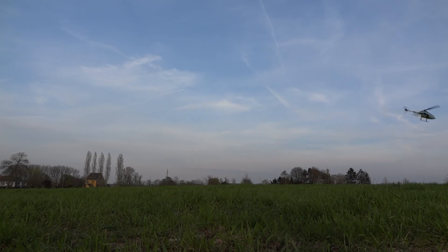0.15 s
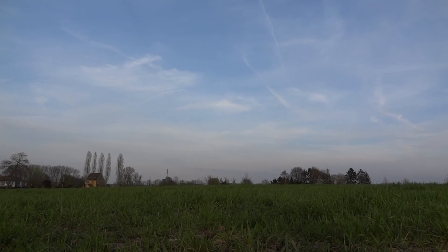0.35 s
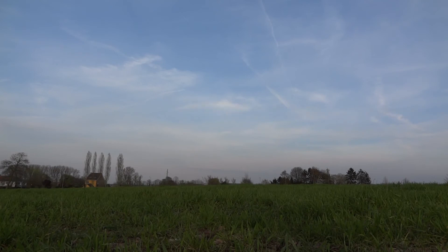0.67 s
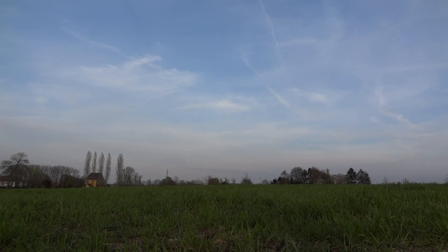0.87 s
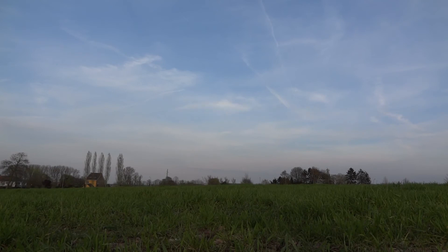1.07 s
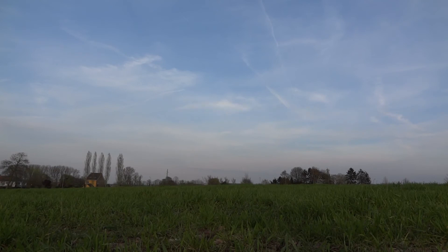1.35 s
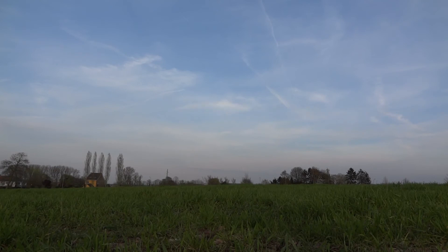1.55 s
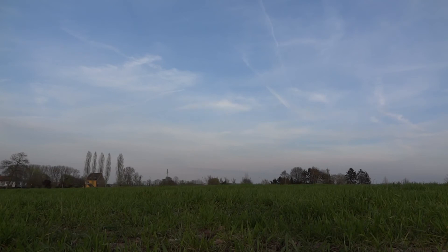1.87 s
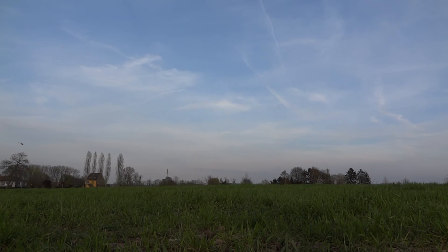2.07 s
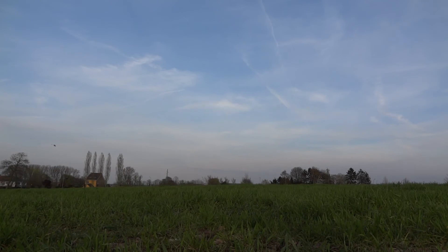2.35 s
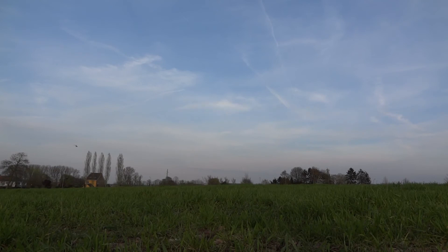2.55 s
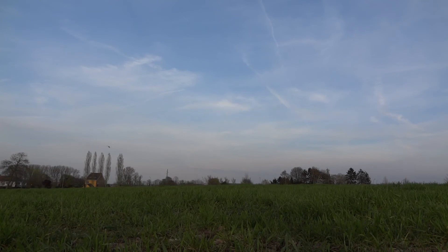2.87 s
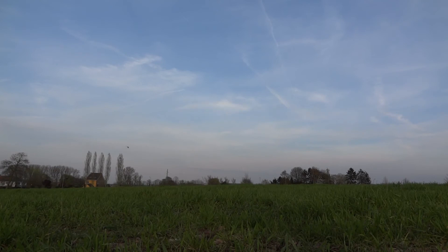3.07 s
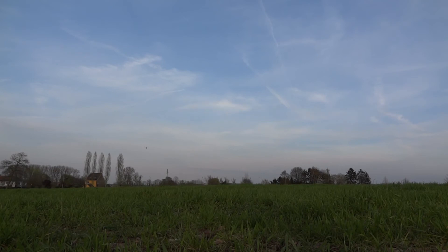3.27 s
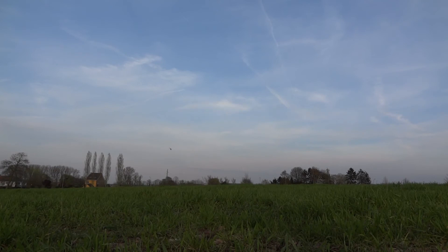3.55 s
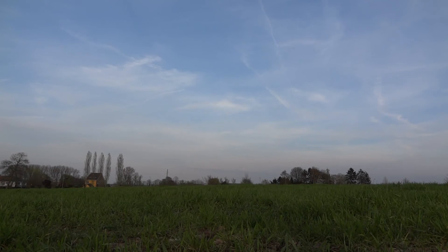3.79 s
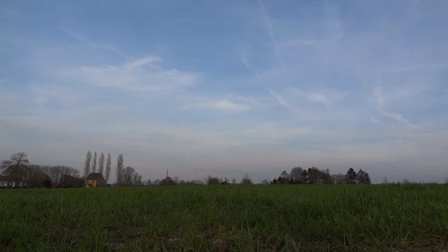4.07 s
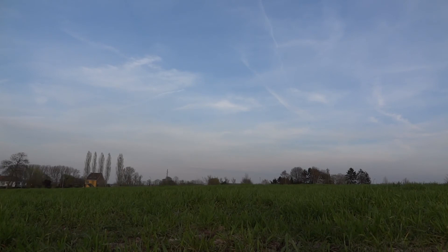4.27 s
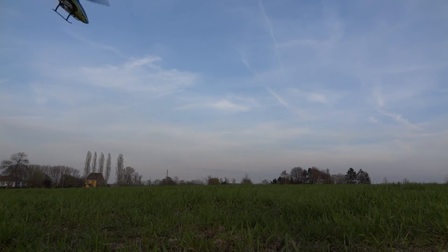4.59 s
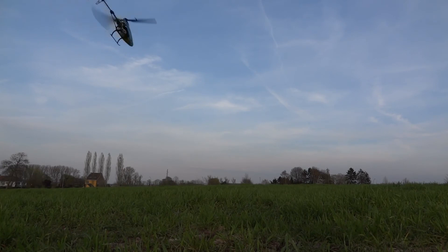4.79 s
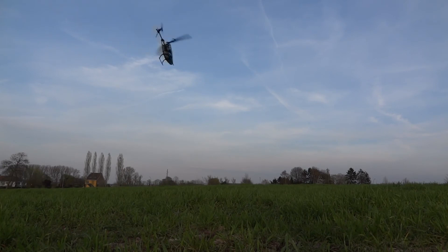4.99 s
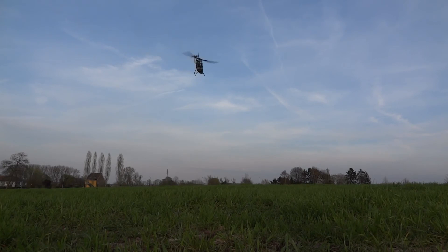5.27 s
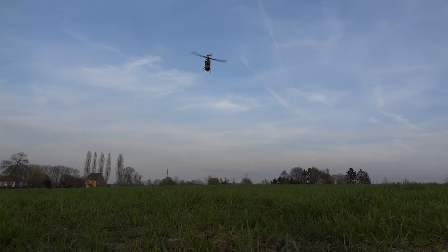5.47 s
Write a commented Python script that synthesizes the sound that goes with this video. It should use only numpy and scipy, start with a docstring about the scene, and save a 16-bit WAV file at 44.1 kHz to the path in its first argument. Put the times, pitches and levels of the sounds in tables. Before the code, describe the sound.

Outdoors over a quiet field, heard from a fixed spot, an electric model helicopter whines and hisses as it recedes, its thin whistle flaring briefly in the distance. About two thirds of the way through it is suddenly close and much louder. The gear whine flutters with the rotor as it passes overhead, then eases a little while the motor hum grows and the bright hiss carries on.

```python
"""Electric model helicopter over a field

It flies away; then, abruptly, it is close and sweeps overhead. The main gear sings and throbs with
the rotor, beating against the tail drive; the motor hums, its speed controller whistles and the gear
teeth hiss. One pitch curve stands for rotor speed and Doppler shift; the hum follows it only in part."""
import sys
import numpy as np
from scipy import signal
from scipy.fft import rfft, irfft
from scipy.io import wavfile
from scipy.ndimage import map_coordinates

SR = 44100
rng = np.random.default_rng(int(sys.argv[2]) if len(sys.argv) > 2 else 0)


def master(y):
    """Save y as 16-bit WAV."""
    cut = np.clip(np.atleast_2d(y).T, -1, 1)
    pcm = np.round(cut * 32767)  # scale
    wavfile.write(sys.argv[1], SR, pcm.astype(np.int16))


N = 248283
TIME = np.arange(N) / SR
BINS = np.fft.rfftfreq(N, 1 / SR)
SWITCH_RATIO, TAIL_RATIO, ROTOR_RATIO = 11.314, 1.032, 1 / 38  # multiples of the gear's mesh rate
SIDE_ON_UNTIL_S, CUT_S, OVERHEAD_S, OVERHEAD_LENGTH_S, LEAVING_S = 0.9, 3.614, 4.52, 0.75, 4.85


def undb(db):
    """Decibels to gain."""
    return 10 ** (np.asarray(db) / 20)

def unit(x):
    """Scale to rms 1."""
    return x / np.std(x)

def across(points):
    """Spread (hz, value) points over the whole spectrum."""
    hz, value = np.transpose(points)
    return np.interp(np.log(BINS + 1), np.log(hz), value)

def band(x, lo_hz, hi_hz):
    """Band-pass with steep, smooth edges."""
    power = 1 / (1 + (BINS / hi_hz) ** 24) / (1 + (lo_hz / (BINS + 1)) ** 24)
    return irfft(rfft(x) * np.sqrt(power), N)

def drift(rate_hz, size=8192):
    """Smooth random motion of spread 1, changing about rate_hz times a second."""
    hz = np.fft.rfftfreq(size, N / SR / size)
    slow = irfft(rfft(rng.standard_normal(size)) * np.exp(-(hz / rate_hz) ** 2))
    return np.interp(np.arange(N) * size / N, np.arange(size), unit(slow))

def turning(hz):
    """Running angle of something that turns hz times a second."""
    return 2 * np.pi * np.cumsum(hz) / SR

def tone(angle, db, rough, rate_hz):
    """A partial whose level and phase flutter by the share rough."""
    wave = (1 + rough * drift(rate_hz)) * np.sin(angle) + rough * drift(rate_hz) * np.cos(angle)
    return np.sqrt(2) * undb(db) * wave / np.sqrt(1 + 2 * rough ** 2)

def curves(table):
    """One straight-line envelope for each column after the time."""
    times, *columns = np.transpose(table)
    return [np.interp(TIME, times, column) for column in columns]

def flights(away, close):
    """Envelopes that jump from the departure to the close pass in 4 ms."""
    share = np.clip((TIME - CUT_S) / .004, 0, 1)
    return [a + share * (b - a) for a, b in zip(curves(away), curves(close))]

def after(time_s, length_s=0.18):
    """A smooth step from 0 to 1 around time_s."""
    return .5 + .5 * np.tanh(2 * (TIME - time_s) / length_s)

def flares(rows):
    """Bell-shaped swells, in dB."""
    return sum(db * np.exp(-(2 * (TIME - peak_s) / length_s) ** 2) for peak_s, length_s, db in rows)

def carried(part, hiss_db):
    """A part's level by distance and facing side; fade_slope is dB gained per dB the hiss fades."""
    close_db, fade_slope, side_on_db, overhead_db, leaving_db = part
    faded_db = -18.5 - hiss_db
    side_on = 1 - after(SIDE_ON_UNTIL_S)
    overhead = after(OVERHEAD_S - OVERHEAD_LENGTH_S / 2) - after(OVERHEAD_S + OVERHEAD_LENGTH_S / 2)
    facing_db = side_on_db * side_on + overhead_db * overhead + leaving_db * after(LEAVING_S)
    return close_db + fade_slope * faded_db + facing_db


# Tone colour of still evening air: freq_hz, relative_db
AIR_SPECTRUM = [(25, -24), (70, 0.5), (150, 6), (400, 9.5), (1000, -4), (3000, 12.5), (15000, -45)]

def field_air():
    """A faint bed of open air, partly alike in both ears."""
    colour = undb(across(AIR_SPECTRUM))
    mid, left, right = (unit(irfft(rfft(rng.standard_normal(N)) * colour, N)) for _ in range(3))
    return (mid + .5 * np.array([left, right])) * undb(-55.5 + 2 * drift(4.5))

def scatter(x, t60_s):
    """Diffuse return from grass and distant trees, different in each ear."""
    t = TIME[:SR // 3]
    tails = rng.standard_normal((2, len(t))) * undb(-60 * t / t60_s)
    tails /= np.sqrt(np.sum(tails ** 2, axis=1, keepdims=True))
    return signal.fftconvolve(x[None], tails, axes=1)[:, :N]


# Motor shaft unbalance, harmonics from the first up: relative_db
MOTOR_SHAFT = [-21, -9, -10.5, -15.5]
# How hum, octave and shaft buzz carry: close_db, fade_slope, side_on_db, overhead_db, leaving_db
HUM_CARRY = (-63.5, 0.2067, -3, 1, 9)
HUM_OCTAVE_CARRY = (-55, -0.4666, 0.5, 6.5, 13.5)
MOTOR_BUZZ_CARRY = (-67.5, -0.12, 11, 10.5, 14)

def motor(commutation, hiss_db):
    """Commutation hum with overtones, over the buzz of an unbalanced shaft five times slower."""
    hum_db, octave_db = carried(HUM_CARRY, hiss_db), carried(HUM_OCTAVE_CARRY, hiss_db)
    shaft = commutation / 5
    buzz = sum(tone(k * shaft, db + 1.5 * drift(1), rough=.25, rate_hz=8)
               for k, db in enumerate(MOTOR_SHAFT, 1))
    hum = tone(commutation, hum_db, rough=.13, rate_hz=20)
    hum += tone(2 * commutation, octave_db, rough=.24, rate_hz=33)
    # the lower sideband stands out in the distance
    drone = tone(commutation - shaft, hum_db - .7 * hiss_db - 37.5, rough=.12, rate_hz=8)
    hum += tone(3 * commutation, octave_db - 6.5, rough=.13, rate_hz=29)
    hum += tone(4 * commutation, .22 * octave_db - 47.5, rough=.85, rate_hz=34)
    return hum + drone + buzz * undb(carried(MOTOR_BUZZ_CARRY, hiss_db))


# Tail shaft unbalance, harmonics from the first up: relative_db
TAIL_SHAFT = [-31, -2, -2, -5, -3]
# How tone (against the main gear) and buzz carry: close_db, fade_slope, side_on_db, overhead_db, leaving_db
TAIL_TONE_CARRY = (-8.5, 0.2176, -3.5, -12, 10)
TAIL_BUZZ_CARRY = (-64, -0.58, 11, 1, 0)

def tail_drive(mesh, gear_db, hiss_db):
    """The tail gear sings just above the main gear and beats with it; its shaft buzzes low."""
    tail_mesh = mesh * TAIL_RATIO
    buzz = sum(tone(k * tail_mesh / 10, db + 2 * drift(1), rough=.87, rate_hz=3.3)
               for k, db in enumerate(TAIL_SHAFT, 1))
    sing = tone(tail_mesh, gear_db + carried(TAIL_TONE_CARRY, hiss_db), rough=.064, rate_hz=72)
    return sing + buzz * undb(carried(TAIL_BUZZ_CARRY, hiss_db) - 3.5)


# Whistle sideband pitches: switch_multiple, mesh_multiple, commutation_multiple
SIDEBAND_MULTIPLES = [(1, -1, 0), (1, 0, -1), (1, 0, 1), (1, 1, 0), (1, 2, 0), (2, 0, 0), (2, 0, -1),
                      (2, -1, 0)]
# Their balance against the hiss: relative_db
SIDEBAND_LEVELS = [-14.5, -15.5, -14.5, -16, -20, -21, -21, -25]
# How the whistle carries against the hiss: close_db, fade_slope, side_on_db, overhead_db, leaving_db
WHISTLE_CARRY = (-11, 0.0474, 0.5, -0.5, -4)
# The tilting body beams the whistle at the listener: peak_s, length_s, boost_db
WHISTLE_FLARES = [(.55, 0.33, 4), (1.88, 0.27, 10.5), (3.7, 0.12, 6), (4.072, .1, 6), (4.76, 0.23, 2)]

def speed_controller(mesh, commutation, hiss_db, top_db):
    """The switching whistle, split into sidebands by the changing load."""
    switch = mesh * SWITCH_RATIO
    sidebands = 0
    for (n_switch, n_mesh, n_commutation), db in zip(SIDEBAND_MULTIPLES, SIDEBAND_LEVELS):
        angle = n_switch * switch + n_mesh * mesh + n_commutation * commutation
        fade_db = top_db + 6.5 if n_switch > 1 else 0  # the octave fades with the top of the hiss
        sidebands += tone(angle, db + fade_db + 1.8 * drift(2), rough=.45, rate_hz=25)
    whistle_db = hiss_db + carried(WHISTLE_CARRY, hiss_db) + flares(WHISTLE_FLARES) - .5
    return tone(switch, whistle_db, rough=.32, rate_hz=75) + sidebands * undb(hiss_db)


# Tone colour of the tooth friction: freq_hz, relative_db
HISS_SPECTRUM = [(120, -39.5), (350, -26.5), (620, -19.5), (950, -14), (1350, -7), (1850, -12.5),
                 (2800, -9.5), (3800, -9), (4150, -7.5), (6400, -11), (7100, -3.5), (8300, 2.5),
                 (11400, -4), (11950, -3), (12400, -6.5), (15600, -2.5)]

def tooth_hiss(mesh, hiss_db, body_db, top_db):
    """Tooth friction: a hiss that partly repeats with every pinion turn and pulses with the mesh."""
    teeth = 10
    turn_s = teeth / 690.5  # one pinion turn at cruise
    repeat = .27 * np.exp(-2j * np.pi * BINS * turn_s)
    scrape = irfft(rfft(rng.standard_normal(N)) / (1 - repeat), N)
    # the pattern speeds up and slows down with the gear
    turns = mesh / (2 * np.pi * teeth)
    scrape = map_coordinates(scrape, [turns * turn_s * SR], order=3, mode="wrap")
    scrape *= 1 + .098 * np.cos(mesh) + .046 * np.cos(mesh * 2 / 5) + .061 * np.cos(mesh / 5)
    scrape *= undb(.3 * drift(45))
    hiss = irfft(rfft(scrape) * undb(across(HISS_SPECTRUM)), N)
    body = unit(band(hiss, 20, 6735)) * undb(body_db - .62)
    # low and far off, the bounce off the grass cancels part of the body
    skimming = np.interp(TIME, [.7, 2.4, 3.6, 3.62], [0, .62, .62, 0])
    body -= skimming * band(body, 3300, 4000)
    bright = unit(band(hiss, 5490, 13200)) * undb(-4.5)
    top = unit(band(hiss, 11030, 17200)) * undb(top_db - 2.7)
    return (body + bright + top) * undb(hiss_db)

def airframe(x):
    """Many small resonances of frame and canopy ripple the spectrum."""
    grid_hz = np.arange(0, SR / 2, 170)
    ripple_db = 1.1 * rng.standard_normal(len(grid_hz))
    return irfft(rfft(x) * undb(np.interp(BINS, grid_hz, ripple_db)), N)

def banking_swish(hiss, peak_s, length_s, boost_db):
    """One narrow band of the hiss swells as the helicopter banks."""
    swell = undb(flares([(peak_s, length_s, boost_db)]))
    return hiss + (swell - 1) * band(hiss, 6700, 7400)


# How gear harmonics carry against the hiss: close_db, fade_slope, side_on_db, overhead_db, leaving_db
THIRD_CARRY = (-27.5, 0.3444, 3.5, 4, -2.5)
FOURTH_CARRY = (-26.5, 0, 0.5, 4, 0)
SIXTH_CARRY = (-31.5, 0, -5, 6.5, -2)
# A thin whine on the sixth flares in the far turn: peak_s, length_s, boost_db
SIXTH_FLARES = [(1.55, 0.44, 14)]

def gear_overtones(mesh, hiss_db):
    """Gritty upper harmonics of the main gear."""
    third = tone(3 * mesh, hiss_db + carried(THIRD_CARRY, hiss_db), rough=1, rate_hz=44)
    fourth = tone(4 * mesh, hiss_db + carried(FOURTH_CARRY, hiss_db), rough=1.8, rate_hz=70)
    sixth_db = hiss_db + carried(SIXTH_CARRY, hiss_db) + flares(SIXTH_FLARES)
    return third + fourth + tone(6 * mesh, sixth_db, rough=.98, rate_hz=75)

def main_gear(mesh, gear_db, octave_db):
    """Mesh tone and octave; each rotor turn briefly unloads the teeth, so the octave dips and sways."""
    rotor = mesh * ROTOR_RATIO + .21 * drift(1.9)
    throb = 1 + .42 * np.cos(rotor) - .16 * np.cos(2 * rotor)
    fundamental = tone(mesh, gear_db, rough=.18, rate_hz=115)
    octave = tone(2 * mesh + .78 * np.sin(rotor), octave_db - .4, rough=.23, rate_hz=72) * throb
    # the tail drive's load beats just above the octave
    tail_load = tone((1 + TAIL_RATIO) * mesh, octave_db - 18.5, rough=1, rate_hz=77)
    return fundamental, octave + tail_load


# Main gear pitch as heard, in the departure and the close pass: time_s, pitch_hz
AWAY_MESH = [(0, 687.2), (0.92, 672.2), (1.6, 680), (2.05, 691.5), (2.7, 689.6), (3.2, 706.7), (3.61, 705)]
PASS_MESH = [(3.62, 702.3), (3.78, 698.2), (4.06, 684.8), (4.3, 703.1), (4.7, 684), (4.88, 696.2),
             (5.0, 679), (5.15, 684), (5.63, 693)]
# Hiss faders, which tell the distance: time_s, hiss_db, body_relative_db, top_relative_db
AWAY_HISS_FADERS = [(0, -22.5, -9.5, -1.5), (0.15, -22.5, -11.5, -5.5), (0.55, -28.6, -9, -7),
                    (0.92, -33, -7, -10), (1.28, -31, -13, -26), (1.6, -37.3, -4.5, -11),
                    (1.92, -35.5, -6.5, -18), (2.22, -44.0, -1.1, -7), (2.9, -44, -3.5, -9.3),
                    (3.61, -43, -3, -8)]
PASS_HISS_FADERS = [(3.62, -20, -5.5, -1.5), (3.9, -19, -10.5, -2.5), (4.4, -20, -9.5, -6.5),
                    (5.0, -20, -9.5, -0.5), (5.63, -17.5, -14, -7)]
# Main gear faders: time_s, gear_db, octave_db
AWAY_GEAR_FADERS = [(0, -49, -34.1), (0.17, -43.5, -33), (0.7, -46.5, -44.5), (1.05, -46.5, -44.5),
                    (1.3, -52.5, -50.7), (1.5, -62.5, -55), (1.72, -56.4, -51.5), (1.93, -70, -48),
                    (2.15, -54.5, -49), (3.61, -57, -46)]
PASS_GEAR_FADERS = [(3.62, -33, -39), (3.88, -29.5, -36.7), (4.28, -33, -29.5), (4.55, -34.5, -32.5),
                    (4.75, -34.5, -30.5), (4.9, -31, -37), (5.12, -36, -44.5), (5.63, -37.5, -43.8)]
# Pan of the treble: time_s, left_minus_right_db
AWAY_PAN = [(0.0, -1.0), (1.32, -2.5), (2.5, -1.0), (3.55, -1.5)]
PASS_PAN = [(3.65, 1.02), (4.234, 2.2), (5.63, 0.44)]

def scene():
    """The helicopter crosses the field, its low tones panned less sharply than its treble."""
    mesh_hz, = flights(AWAY_MESH, PASS_MESH)
    hiss_db, body_db, top_db = flights(AWAY_HISS_FADERS, PASS_HISS_FADERS)
    gear_db, octave_db = flights(AWAY_GEAR_FADERS, PASS_GEAR_FADERS)
    pan_db, = flights(AWAY_PAN, PASS_PAN)
    # the hum partly follows the gear, and rises as the helicopter climbs away
    hum_hz = 411.5 + .35 * (mesh_hz - 690) + 4.5 * after(LEAVING_S)
    mesh, commutation = turning(mesh_hz), turning(hum_hz)
    gear, octave = main_gear(mesh, gear_db, octave_db)
    low = gear + tail_drive(mesh, gear_db, hiss_db) + motor(commutation, hiss_db)
    hiss = airframe(tooth_hiss(mesh, hiss_db, body_db, top_db))
    hiss = banking_swish(hiss, peak_s=1.25, length_s=.51, boost_db=4.8)
    whistle = speed_controller(mesh, commutation, hiss_db, top_db)
    high = hiss + octave + gear_overtones(mesh, hiss_db) + whistle
    sides_db = pan_db * np.array([[1], [-1]]) / 2
    direct = low * undb(.93 + .22 * sides_db) + high * undb(sides_db)
    # the surroundings' share grows with distance; the grass swallows treble
    send = (high + 2.2 * low + 1.5 * band(hiss, 300, 2300)) * undb(-.45 * hiss_db)
    return direct + undb(-29) * scatter(send, t60_s=.6) + field_air()


# Phase lead of the left microphone port: freq_hz, lead_rad
LEFT_PORT_LEAD = [(50, 0.053), (300, 0.57), (700, 1), (1400, 0.84), (2800, 0.47), (5000, 0.36),
                  (10000, 0.096)]

def record(dry):
    """Two close microphone ports shift the midrange in phase; the top is cut off steeply."""
    lead = np.exp(.5j * across(LEFT_PORT_LEAD) * np.array([[1], [-1]]))
    ports = irfft(rfft(dry) * lead, N)
    return signal.sosfilt(signal.ellip(12, .2, 80, 15750, fs=SR, output="sos"), ports)


dry = scene()
out = record(dry)
master(out)
```